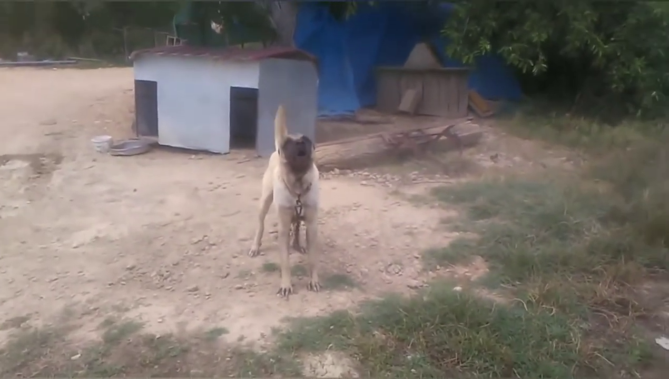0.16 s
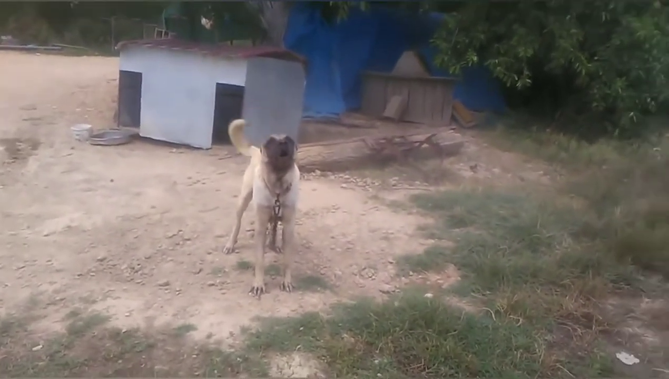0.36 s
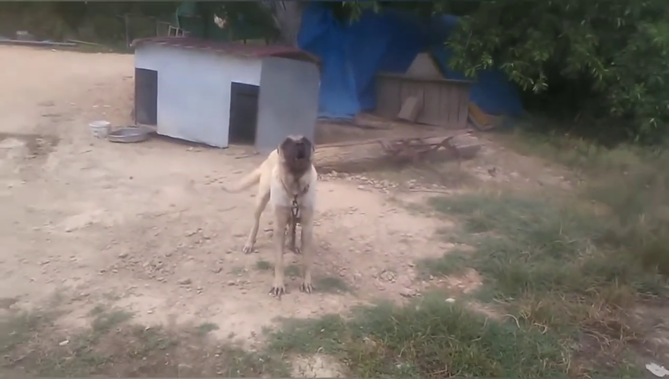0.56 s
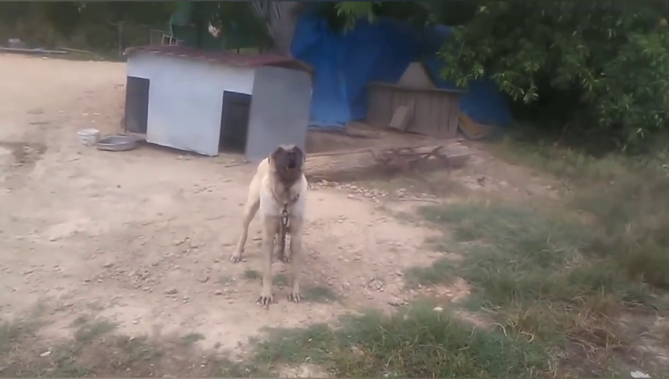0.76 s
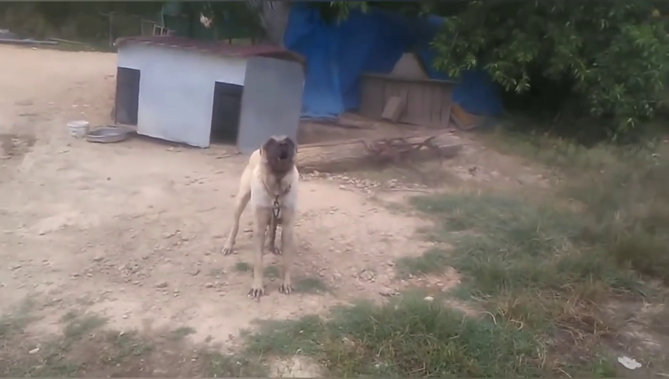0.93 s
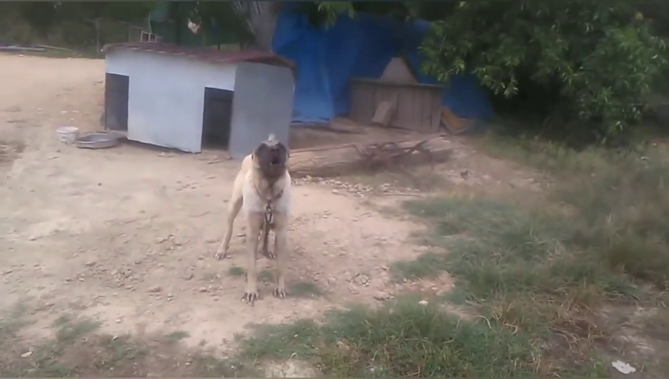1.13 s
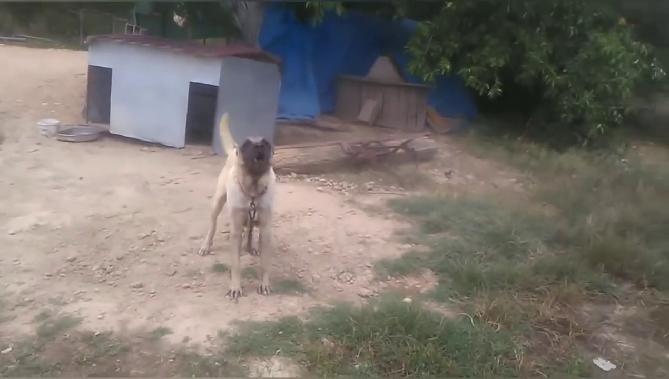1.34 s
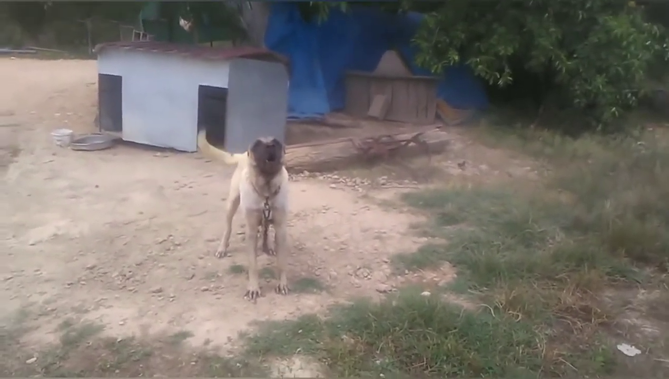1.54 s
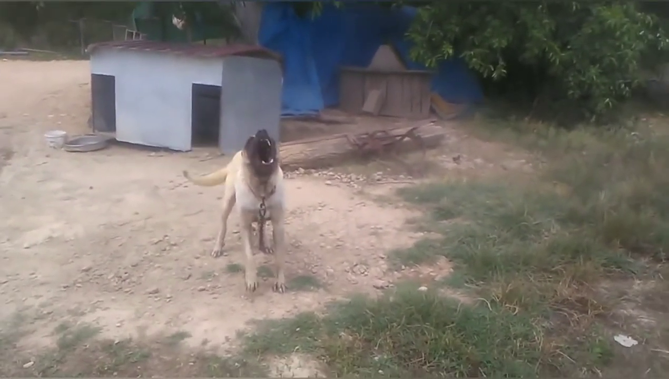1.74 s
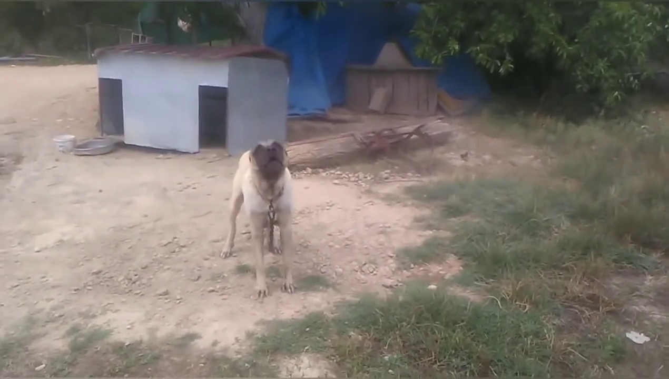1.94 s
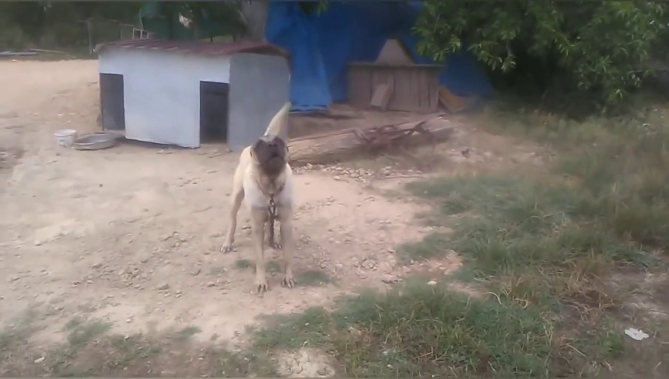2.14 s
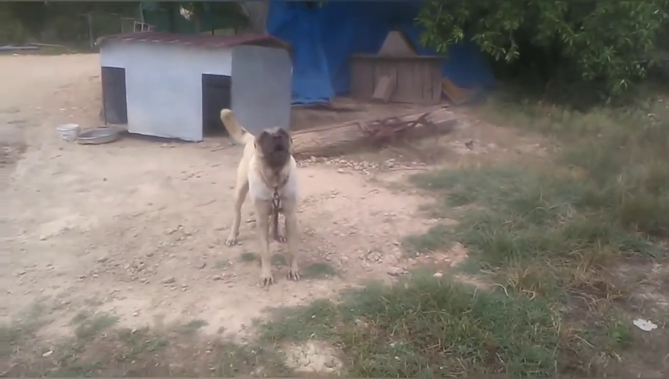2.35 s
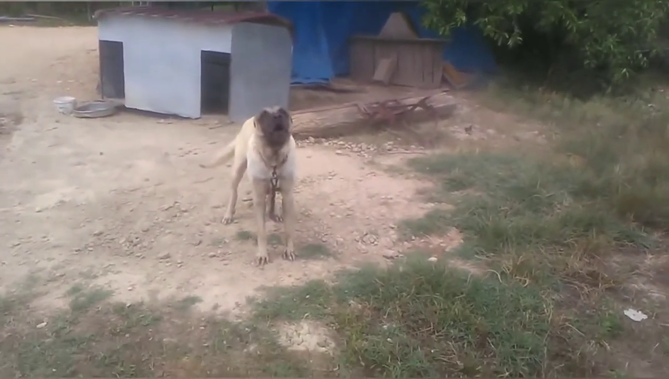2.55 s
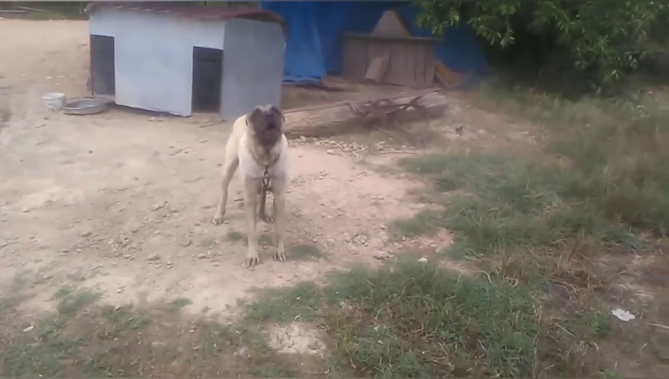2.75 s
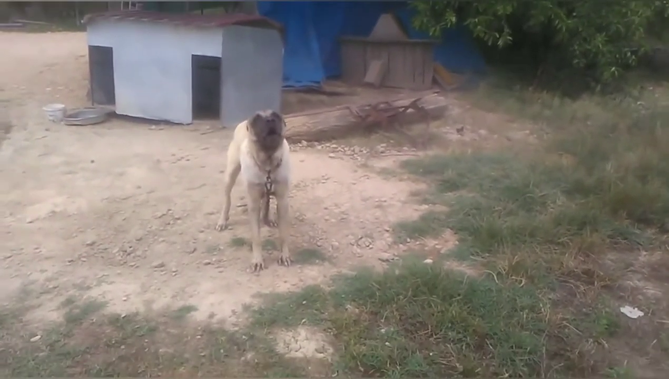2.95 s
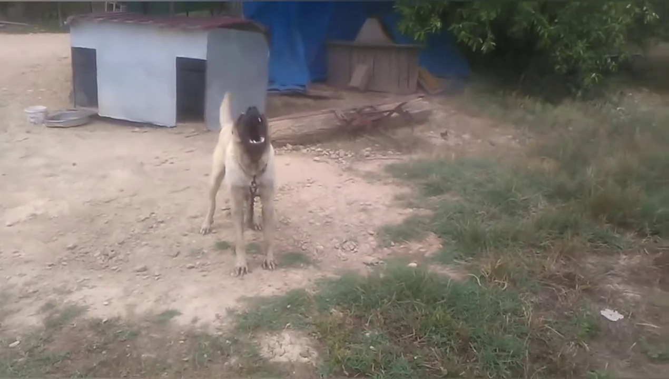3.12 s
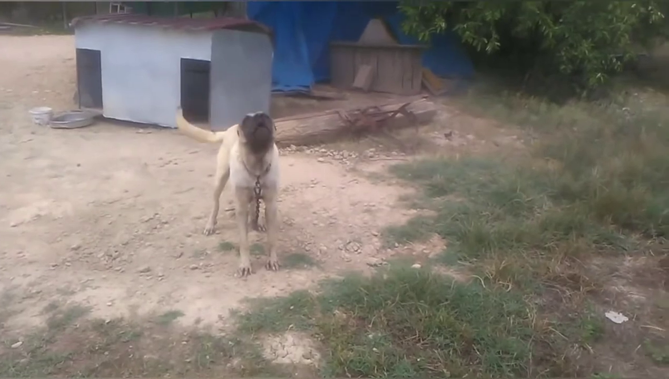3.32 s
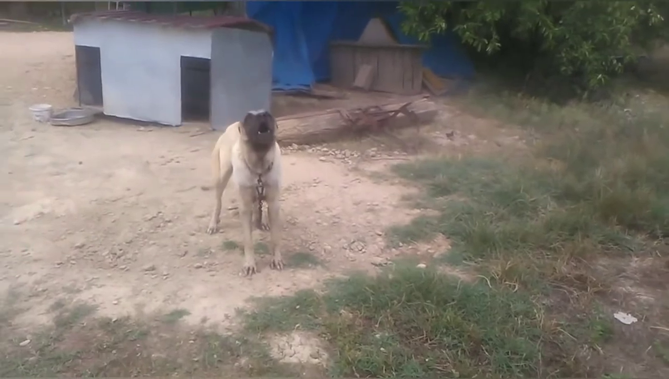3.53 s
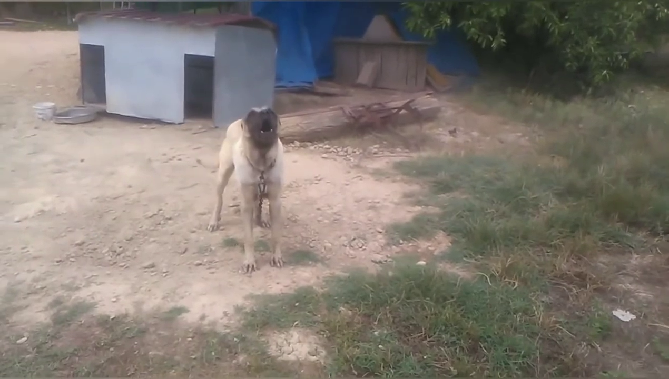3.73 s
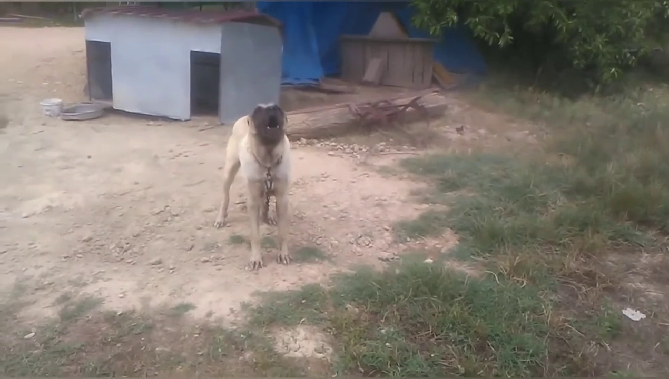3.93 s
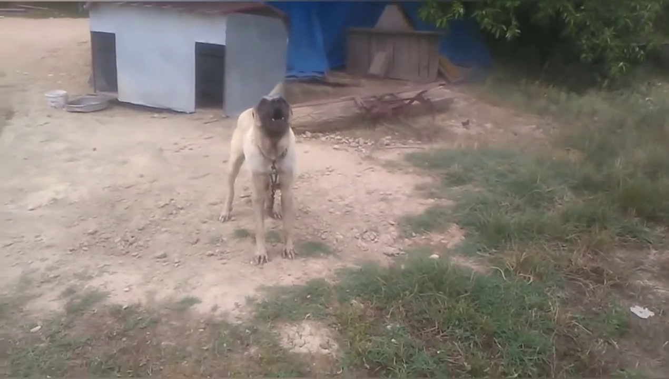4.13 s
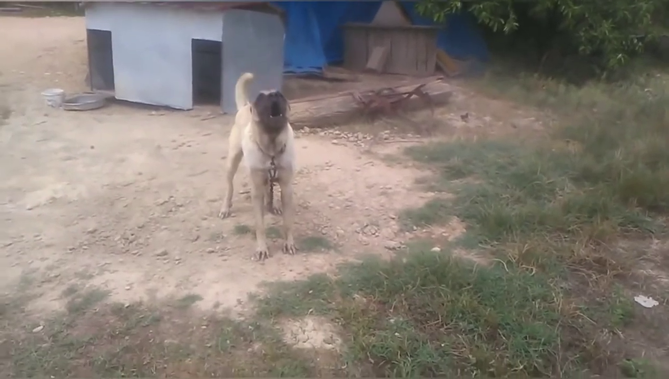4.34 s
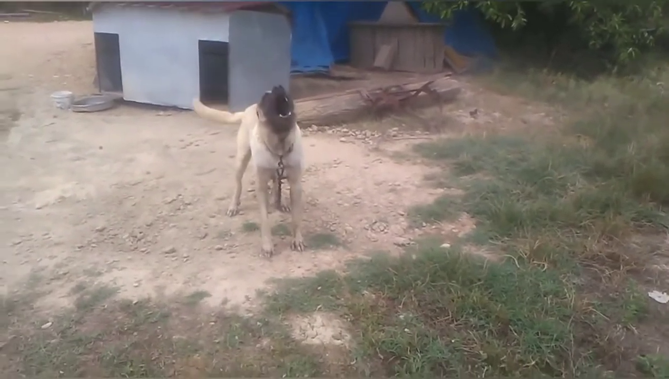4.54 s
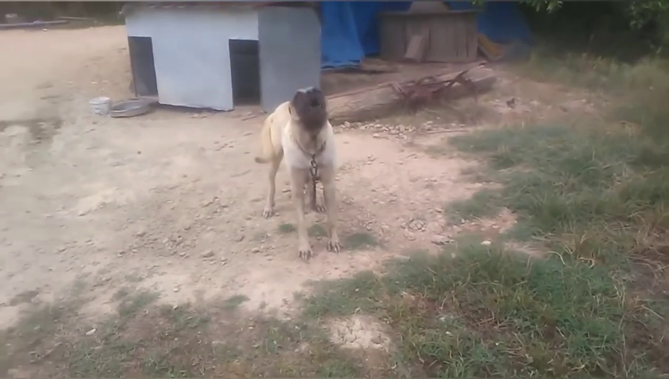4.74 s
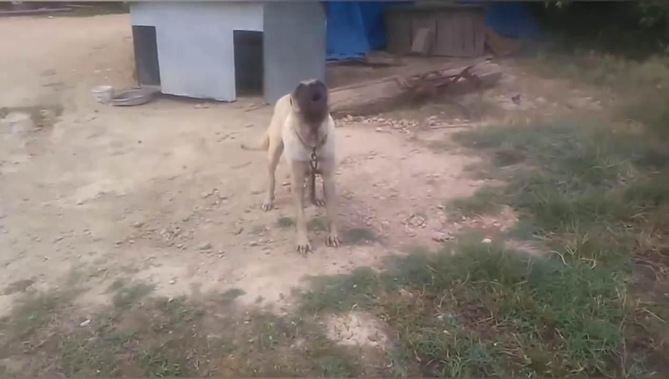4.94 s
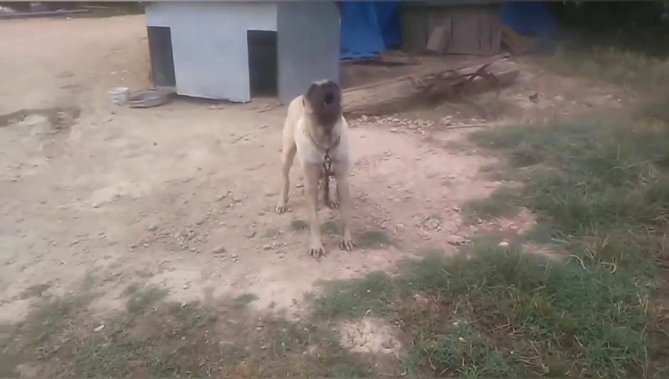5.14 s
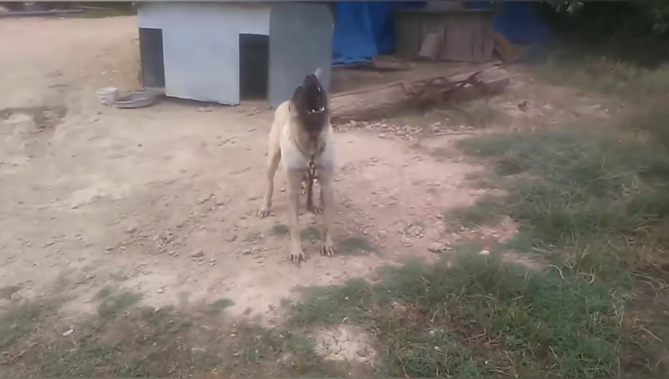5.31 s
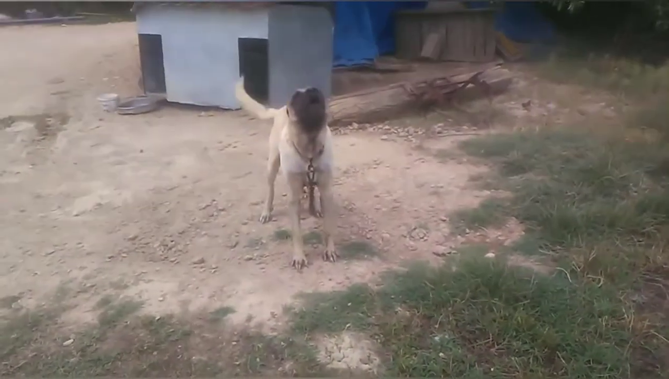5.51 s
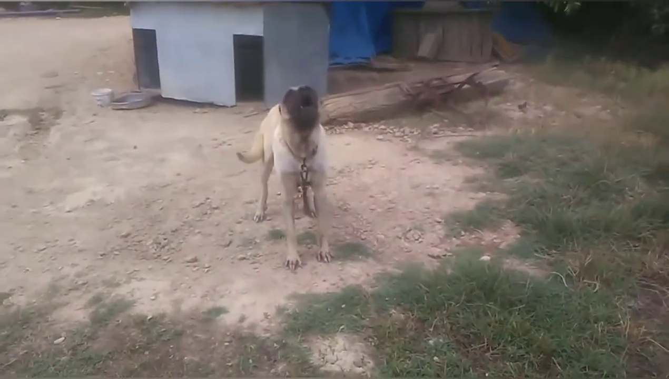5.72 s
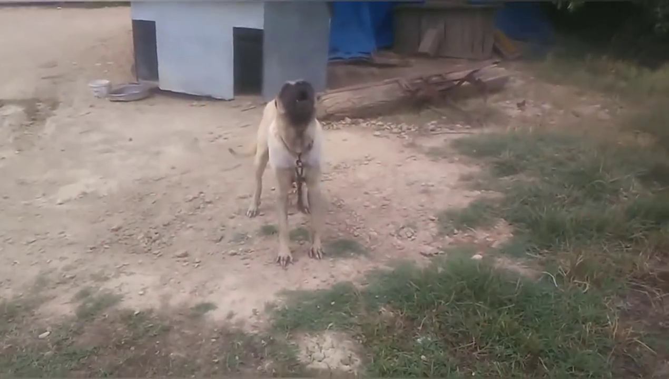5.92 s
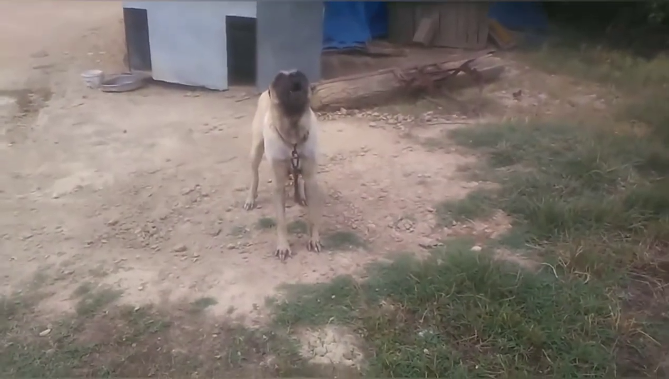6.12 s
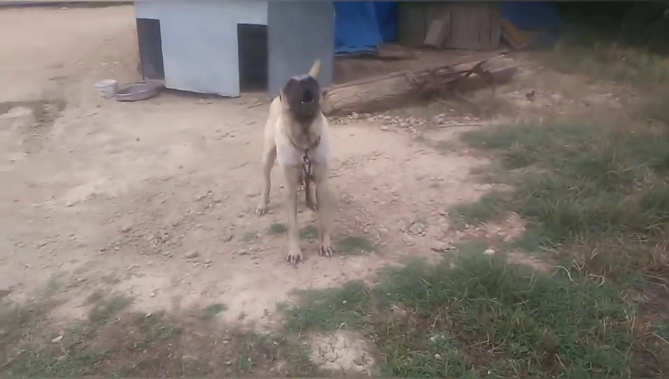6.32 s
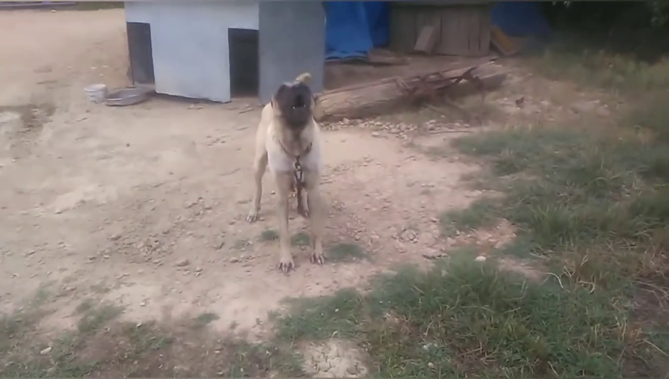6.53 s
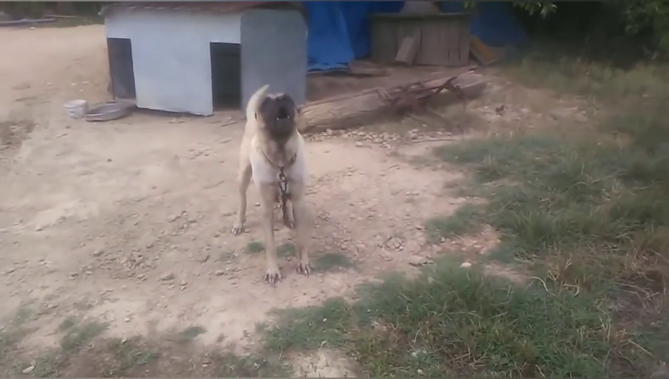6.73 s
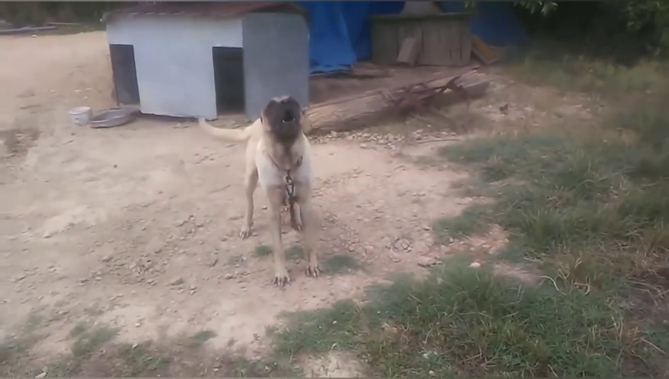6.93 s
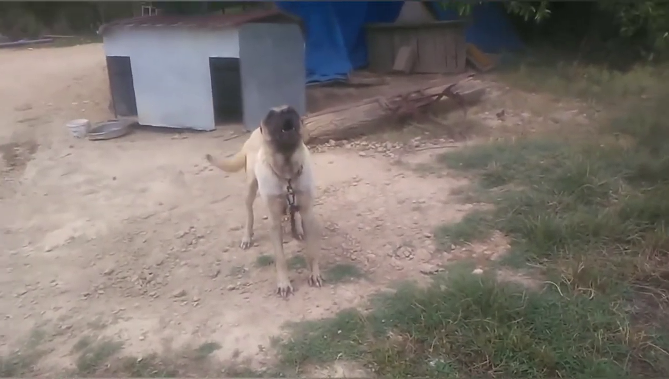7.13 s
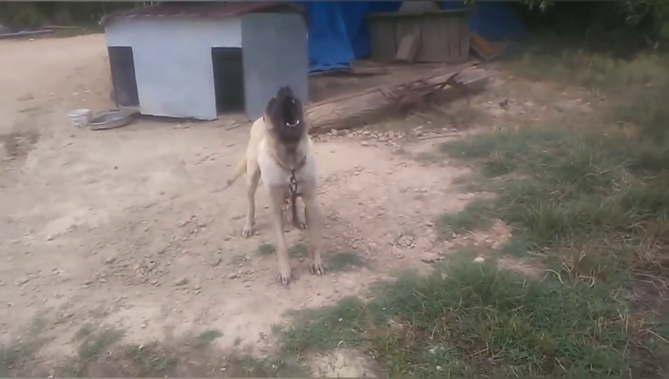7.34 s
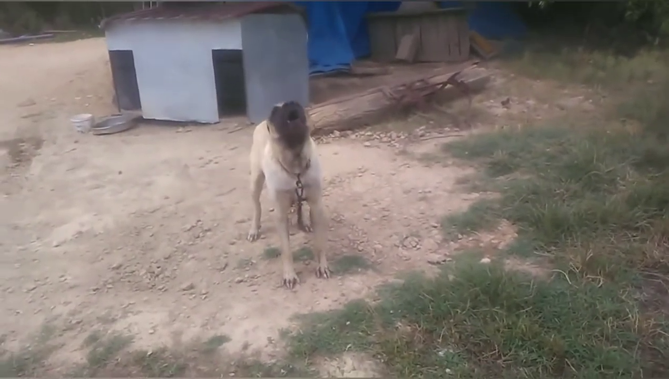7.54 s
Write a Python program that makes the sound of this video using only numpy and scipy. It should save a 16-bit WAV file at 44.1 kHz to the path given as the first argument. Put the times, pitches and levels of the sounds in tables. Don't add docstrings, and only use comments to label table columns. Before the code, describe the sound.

A large dog gives five deep, slowed barks in an open yard, with long echoes, motor drone, hiss and faint far dogs whining.

```python
import sys
import numpy as np
from scipy import signal
from scipy.fft import rfft, irfft, next_fast_len
from scipy.io import wavfile
from scipy.ndimage import uniform_filter1d, minimum_filter1d

SR = 44100
rng = np.random.default_rng(int(sys.argv[2]) if len(sys.argv) > 2 else 0)


def generate_wav(signal):
    frames = np.transpose(np.atleast_2d(signal))
    scaled = np.clip(frames, -1, 1) * 32767
    pcm = np.round(scaled).astype(np.int16)
    wavfile.write(sys.argv[1], SR, pcm)


def attenuation_scalar(level_db):
    decades = np.asarray(level_db, float) / 20
    return 10 ** decades


N = 338247

# (frequency [Hz], width [Hz], level [dB])
ECHO_MODES = [(260, 45, -3.5), (370.5, 108, -1.5), (479, 123, -6), (1130, 75, -12), (1913, 78, -23),
              (2378, 47, -19), (2850, 11, -23.5), (3780, 220, -36.5), (5120, 320, -30)]
# (start [s], end [s], first level [dB], last level [dB], throat ring in it [dB])
RETURNS = [
    (-.1, 0.557, -31, -35.5, -11),
    (2.16, 2.491, -21.5, -27.5, -27),
    (2.455, 3.24, -18.5, -29, -11),
    (3.656, 3.723, -19, -30, -19),
    (4.796, 5.34, -17.5, -29, -11),
    (5.693, 6.36, -22.5, -30.5, -2.5),
]
# (time [s], level [dB])
HISS_GAIN = [(0.0, -61.5), (.62, -74.5), (.72, -55.5), (1.3, -60.5), (1.67, -68.5), (1.72, -59),
             (2.43, -58.5), (2.65, -50.5), (3.01, -60), (3.22, -51.5), (3.72, -68.5), (3.84, -55),
             (4.44, -60.5), (4.57, -59), (5.98, -56.5), (6.47, -62.5), (6.56, -51), (7.45, -58.5)]
# (frequency [Hz], width [Hz], level [dB])
PORT_MODES = [(4830, 520, 7.5), (5600, 170, 4), (6670, 370, 1), (7960, 730, 8), (10940, 780, 3),
              (11160, 2400, 3), (13700, 700, -13.5)]
# (start [s], end [s], yard [dB], motor [dB], leftover echo [dB])
LULLS = [
    (0.056, 0.483, -51.5, -34.5, -62),
    (0.6, 1.68, -38.5, -27, -51),
    (3.714, 4.5, -36.5, -43.5, -48.5),
    (5.97, 6.61, -45, -39, -81),
    (6.459, 7.55, -35.5, -32.5, -48.5),
]
# (frequency [Hz], width [Hz], level [dB])
YARD_MODES = [(470, 120, 2.5), (735, 90, 1.5), (1060, 70, 3), (1325, 90, -9), (1636, 85, 2.5),
              (1915, 75, 3), (2236, 220, -6), (2732, 180, -10), (3776, 220, -18), (4350, 310, -22.5)]
# (time [s], pitch [Hz], level [dB])
FAR_CALLS = [
    [(3.785, 349.4, -21.5), (3.83, 332, -21), (3.9, 289.6, -25.5), (3.96, 310, -32)],
    [(6.07, 1190, -33), (6.18, 1228, -29.5), (6.3, 1264, -29.5), (6.48, 1251, -23.5), (6.58, 1280, -29.5),
     (6.67, 1344, -25)],
    [(6.25, 960, -37), (6.35, 959, -42), (6.45, 945, -47)],
    [(6.99, 846, -24.5), (7.08, 855, -22.5), (7.24, 722, -31.5), (7.35, 718, -28), (7.48, 710, -32.5)],
    [(7.1, 1660, -50), (7.38, 1640, -37), (7.48, 1645, -29)],
    [(.15, 2120, -42), (.18, 2410, -44), (.22, 2370, -35)],
]
# (pitch [Hz], second partial [dB])
WHINE_OVERTONE = [(700, -6), (950, -10), (1250, -22), (1650, -48)]
# (time [s], pitch [Hz], level [dB])
BARKS = [
    [(1.715, 280, -32), (1.745, 294.1, -10), (1.79, 428, 2.5), (1.84, 487, -9), (1.93, 474.1, -1.5),
     (2.0, 345, -6.5), (2.07, 296, -10), (2.135, 283, -13.5), (2.18, 282, -22.5)],
    [(3.15, 289, -23), (3.2, 330.1, -8), (3.33, 459.9, -4), (3.4, 507.8, -9), (3.48, 458.6, 8.5),
     (3.54, 300.7, -20), (3.585, 263.6, -10), (3.635, 254, -17), (3.67, 250, -34)],
    [(4.49, 280, -34), (4.56, 319.8, -11), (4.62, 448, -5), (4.67, 485.2, -4.5), (4.72, 517.5, 4.5),
     (4.82, 482.5, -8.5), (4.92, 395.9, -10.5), (4.96, 343.1, -44)],
    [(5.26, 287.7, -22), (5.33, 348.4, -5.5), (5.45, 477.6, -3.5), (5.56, 515.9, -4.5), (5.62, 458.9, -1),
     (5.7, 328, -9), (5.77, 260, -17.5), (5.83, 249.9, -24.5)],
    [(7.465, 280, -34), (7.49, 305.3, -4), (7.52, 424.8, -2), (7.555, 467.8, 9), (7.62, 503, -11),
     (7.73, 479.6, 2)],
]
# (time [s], strain of the folds [0-1], jaw opening [0-1])
EFFORT = [
    [(1.715, 0.18, 0.6), (1.79, 0.24, 0.48), (1.85, 0.01, 0.64), (1.92, 0.27, .7), (1.97, 0.52, 0.53),
     (2.05, 0.1, 0.39), (2.15, 0.16, 0.76)],
    [(3.15, 0.42, 0.5), (3.23, 0.1, .2), (3.33, 0.42, 0.71), (3.38, 0.28, 0.77), (3.45, 0.62, 0.6),
     (3.53, 0.39, 0.76), (3.63, 0.34, 0.26)],
    [(4.49, 0.55, 0.6), (4.62, 0, 0.44), (4.68, 0.64, 0.62), (4.77, 0.67, 0.54), (4.83, 0.68, 0.78),
     (4.93, 0.42, 0.36)],
    [(5.26, 0.23, 0.28), (5.45, .05, 0.54), (5.5, 0.73, 0.78), (5.56, 0.46, 0.73), (5.62, 0.36, 0.6),
     (5.7, 0.52, 0.55), (5.78, 0, .05)],
    [(7.465, 0.35, 0.5), (7.53, 0.29, 0.43), (7.59, 0.38, 0.65), (7.64, 1, 0.74), (7.7, 0.65, 0.57)],
]
# (frequency [Hz], width [Hz], level [dB])
THROAT_MODES = [(765, 60, 0), (640, 90, -11), (865, 50, -9)]
# (frequency [Hz], width [Hz], level [dB])
MOUTH_MODES = [(1140, 150, 7), (1580, 140, 0), (1965, 95, 4.5), (2408, 170, -9), (3380, 1900, -20)]
# (time [s], lift of the upper mouth resonances [dB])
SNARL = [(1.75, -3.5), (2.05, 0), (3.3, 1.2), (3.6, -4.5), (4.65, 1.5), (4.86, 0), (5.0, 8), (5.4, -2),
         (5.75, -7.5), (7.6, -5)]
# (frequency [Hz], left minus right [dB])
PORT_TILT = [(60, -0.5), (120, -2.5), (370, -0.5), (1230, -5.5), (2250, -1.5), (4110, 0), (7520, -15),
             (13800, -17.5)]

HOP, FIRST, AHEAD = 1024, 1560, 3072
M = N // 2 + 4 * HOP
HEARD = (2 * (np.arange(M) - AHEAD) + FIRST + 2 * HOP) / SR
HZ = np.fft.rfftfreq(M, 1 / SR)

DUCK_DB = -5
OPEN_S, CLOSE_S = 0.13, 0.28
GATE_S = 0.052


def unit(x):
    return x / np.sqrt(np.mean(x ** 2))


def between(pair, share):
    return pair[0] + (pair[1] - pair[0]) * share


def read(rows):
    s, *columns = np.transpose(rows)
    return [np.interp(HEARD, s, c) for c in columns]


def window(start, end, rise, fall):
    return np.clip(np.minimum((HEARD - start) / rise, (end - HEARD) / fall), 0, 1)


def barking(rise, fall):
    return sum(window(b[0][0], b[-1][0], rise, fall) for b in BARKS)


def ring(x, modes):
    gain = 0
    for k, (hz, width, db) in enumerate(modes):
        detuning = (HZ - hz ** 2 / (HZ + 1)) / (1.735 * width)
        gain = gain + attenuation_scalar(db) * (-1) ** k / (1 + 1j * detuning) ** 2
    return irfft(rfft(x) * gain, M)


def walk(rate, channels=1):
    noise = rng.standard_normal((channels, M))
    return unit(irfft(rfft(noise) / (1 + (HZ / rate) ** 4), M))


def air(like):
    mid, side = rng.standard_normal((2, M))
    like = np.clip(like, 0, 1)
    return np.sqrt(1 + like) * mid + np.sqrt(1 - like) * side * np.array([[1], [-1]])


def flicker(modes, like, walk_db, rate):
    return unit(sum(ring(air(like), [mode]) * attenuation_scalar(walk_db * walk(rate)) for mode in modes))


def steady(x, seconds):
    return x / np.sqrt(uniform_filter1d(x ** 2, int(seconds * SR), mode="wrap") + 1e-12)


def scatter(x, t60_s, like):
    tail = air(like) * np.exp(-np.log(1000) * np.arange(M) / SR / t60_s)
    return irfft(rfft(x) * rfft(tail / np.sqrt(np.sum(tail[0] ** 2))), M)


def echoes(dog):
    echo_gain = ring_gain = 0
    for start, end, first_db, last_db, ring_db in RETURNS:
        level_db = np.interp(HEARD, (start, end), (first_db, last_db))
        gain = window(start, end, GATE_S, GATE_S) * attenuation_scalar(level_db)
        echo_gain = echo_gain + gain
        ring_gain = ring_gain + gain * attenuation_scalar(ring_db)
    for start, end, _, _, echo_db in LULLS:
        echo_gain = echo_gain + window(start, end, OPEN_S, CLOSE_S) * attenuation_scalar(echo_db)
    late = scatter(dog, 14.0, 0.72)
    chest = unit(steady(ring(late, [(358, 89, 0)]), 0.51))
    returns = 0.68 * chest + 0.91 * flicker(ECHO_MODES, 0.97, 2.73, 28)
    throat = attenuation_scalar(2.5 * walk(8)) * unit(steady(ring(late, THROAT_MODES), 0.06))
    return echo_gain * returns + ring_gain * throat


def traffic():
    gain = attenuation_scalar(-45.5)
    for start, end, *_ in RETURNS:
        gain = gain + window(start, end, GATE_S, GATE_S) * attenuation_scalar(-36)
    rumble = unit(ring(air(1.0), [(108.4, 11.2, -5.0), (153.0, 9, -12.5)]))
    return gain * attenuation_scalar(DUCK_DB * barking(0.069, 0.13)) * rumble


def wind():
    gust_db = 3.0 * walk(7.3)
    noise = unit(ring(air(0.53), [(15.3, 9.0, -6.0), (23.8, 12.4, -4.5), (61.7, 16.4, -14)]))
    return attenuation_scalar(-36 + gust_db + DUCK_DB * barking(0.069, 0.13)) * noise


def port_hiss(motor_phase):
    hiss = flicker(PORT_MODES, .01, 3.0, 5) * (1 + 0.22 * np.cos(motor_phase))
    return attenuation_scalar(read(HISS_GAIN)[0] + 4.0) * hiss


def refill():
    hiss = np.hstack([flicker(PORT_MODES, .01, 3.0, 4) for _ in range(2)])[:, :N]
    gain_db = np.interp(np.arange(N) / SR, *np.transpose(HISS_GAIN))
    return attenuation_scalar(gain_db + 4.9) * hiss


def motor_rotation():
    return 2 * np.pi * np.cumsum(86.1 * (1 + 0.004 * walk(12)[0])) / SR


def motor(phase):
    gain = 0
    for start, end, _, motor_db, _ in LULLS:
        gain = gain + window(start, end, OPEN_S, CLOSE_S) ** 3 * attenuation_scalar(motor_db)
    rumble = unit(ring(air(1.0), [(61, 6, -7), (84, 14, -5.5)]))
    return gain * (np.sqrt(2) * np.sin(phase) + 0.3 * rumble)


def yard_noise(motor_phase):
    gain = 0
    for start, end, yard_db, _, _ in LULLS:
        gain = gain + window(start, end, OPEN_S, CLOSE_S) * attenuation_scalar(yard_db)
    noise = flicker(YARD_MODES, .8, 2.2, 10) * (1 + .2 * np.cos(motor_phase))
    return attenuation_scalar(5.5) * gain * noise


def background(dog):
    phase = motor_rotation()
    return echoes(dog) + traffic() + wind() + port_hiss(phase) + motor(phase) + yard_noise(phase)


def far_dogs():
    out = 0
    for call in FAR_CALLS:
        hz, db = read(call)
        fade = np.clip(np.minimum(HEARD - call[0][0], call[-1][0] - HEARD) / 0.012 + .5, 0, 1)
        phase = 2 * np.pi * np.cumsum(hz * (1 + 0.0139 * walk(55.8)[0])) / SR
        second = attenuation_scalar(np.interp(hz, *np.transpose(WHINE_OVERTONE)))
        tone = np.sin(phase) + second * np.sin(2 * phase)
        out = out + fade * attenuation_scalar(db + 1 + 1.8 * walk(30)[0]) * tone
    return out + attenuation_scalar(-13.0) * scatter(out, 0.79, 0.68)


def mouth_ring(source):
    snarl_db, = read(SNARL)
    out = 0
    for mode in MOUTH_MODES:
        level_db = 10.8 and 3.5 * walk(10.8)[0] + snarl_db * (1400 < mode[0] < 2200)
        out = out + ring(source, [mode]) * attenuation_scalar(level_db)
    return steady(out, .03)


def bark():
    hz, db = read(sum(BARKS, []))
    strain, jaw = np.clip(read(sum(EFFORT, [])), 0, 1)
    half = np.clip(between((.05, .9), strain), 0, 1)
    rough = np.clip(between((.08, .35), strain), 0, 1)
    shake, slip = walk(107.0, channels=2)
    phase = 2 * np.pi * np.cumsum(hz * (1 + 0.119 * rough * slip)) / SR

    upper = 0
    for k in range(3, 20):
        share = half if k % 2 else 1 - 0.24 * half
        upper = upper + share * np.sin(k * phase / 2 + k * k) / (k / 3) ** (2.0 - 1.0 * half)
    upper = upper * (1 + 1.6 * rough * shake)
    breath = rough * rng.standard_normal(M) * (1 + np.cos(phase))

    climb = np.clip((hz - 241) / (472 - 241), 0, 1)
    second = attenuation_scalar(between((-1, -32.5), climb))
    body = np.sin(phase) + second * np.sin(2 * phase) + .02 * half * np.sin(phase / 2)
    body = np.sqrt(2) * body * (1 - rough ** 2 + 2.94 * rough * shake)
    throat = steady(ring(upper + 2.2 * breath, THROAT_MODES), .03)
    mouth = mouth_ring(upper + 11.2 * breath)

    voice = attenuation_scalar(between((-1, -15), strain)) * body
    voice = voice + attenuation_scalar(between((-15, 0.5), strain)) * throat
    voice = voice + attenuation_scalar(between((-30, -5.5), jaw)) * mouth
    return barking(.012, .012) * attenuation_scalar(db) * voice


def scene():
    dog = bark()
    nearby = attenuation_scalar(-11) * scatter(dog, 0.07, 0.5)
    return np.pad(dog + nearby + far_dogs() + background(dog), ((0, 0), (0, N - M)))


def limit(x, top):
    peak = -minimum_filter1d(-np.abs(x).max(0), size=301)
    return x * uniform_filter1d(np.minimum(1, top / (peak + 1e-9)), size=301)


def half_speed(x):
    out, i = np.zeros((2, N + 8 * HOP)), np.arange(-HOP, HOP)
    fade = np.cos(np.pi * i / (2 * HOP)) ** 2
    x = np.pad(x, ((0, 0), (2 * HOP, 0)))
    for g in range(-2, N // HOP + 1):
        source = HOP * (g // 2) + (AHEAD if g % 2 else HOP // 2)
        target = FIRST + HOP * (g - 1)
        out[:, 4 * HOP + target + i] += fade * x[:, 2 * HOP + source + i]
    return out[:, 4 * HOP:4 * HOP + N]


def two_ports(x):
    size = next_fast_len(N)
    hz = np.fft.rfftfreq(size, 1 / SR)
    tilt_hz, tilt_db = np.transpose(PORT_TILT)
    tilt_db = np.interp(np.log(hz + 1), np.log(tilt_hz), tilt_db)
    share = np.sqrt(2 / (1 + attenuation_scalar(np.array([-2 * tilt_db, 2 * tilt_db]))))
    delay = np.exp(-2j * np.pi * hz * np.array([[3.5], [0]]) / SR)
    return irfft(rfft(x, size) * share * delay, size)[:, :N]


def top_cut(x):
    return signal.sosfilt(signal.butter(12, 14350, fs=SR, output="sos"), x)


def record(dry):
    held = np.clip(limit(dry, 0.79), -.69, .69)
    slowed = 1.148 * half_speed(held) + refill()
    return top_cut(two_ports(slowed))


dry = scene()
out = record(dry)
generate_wav(out)
```